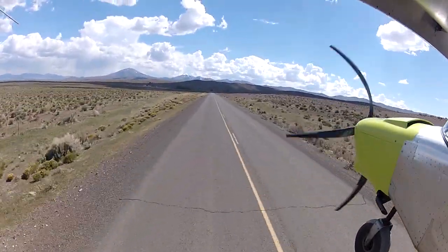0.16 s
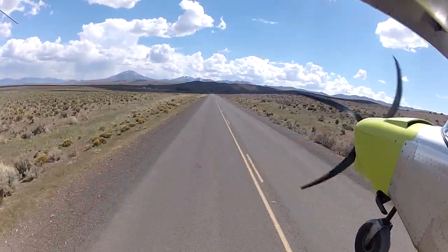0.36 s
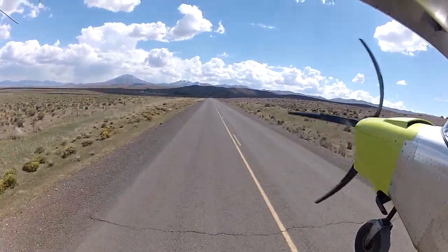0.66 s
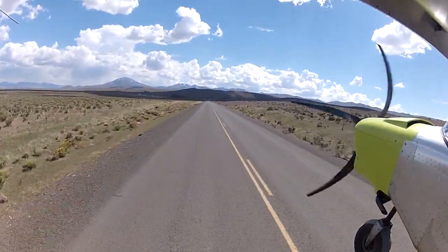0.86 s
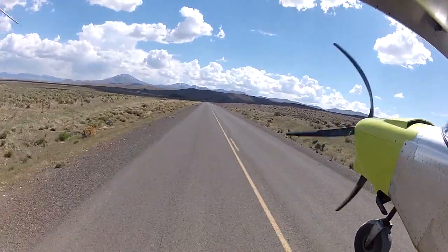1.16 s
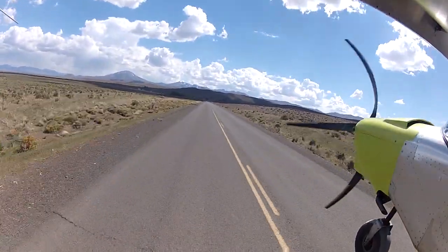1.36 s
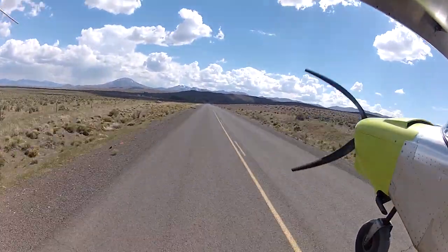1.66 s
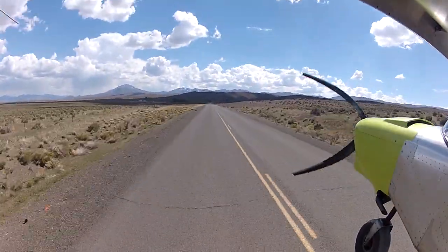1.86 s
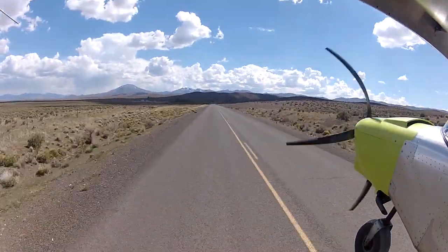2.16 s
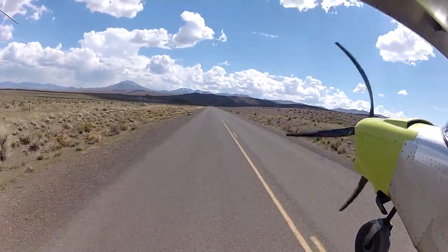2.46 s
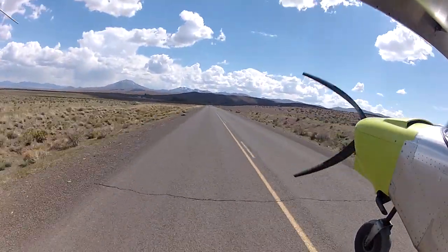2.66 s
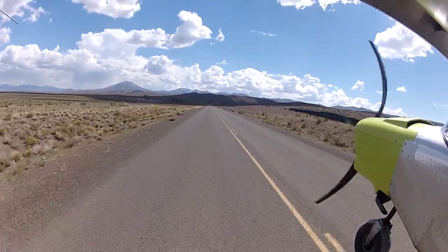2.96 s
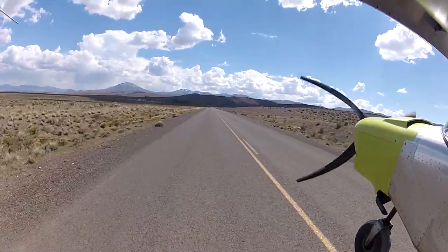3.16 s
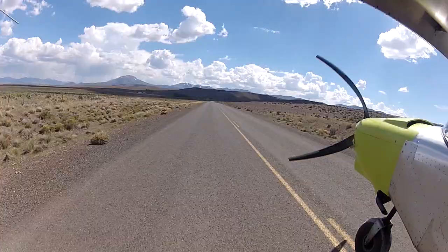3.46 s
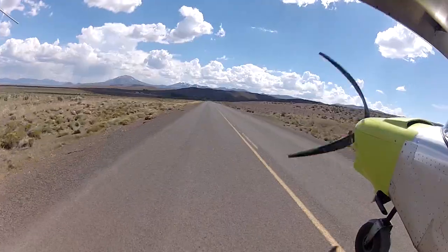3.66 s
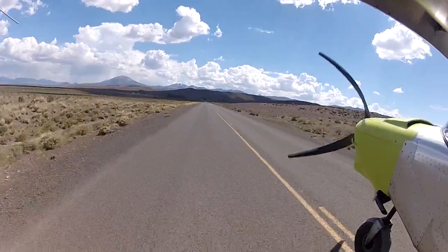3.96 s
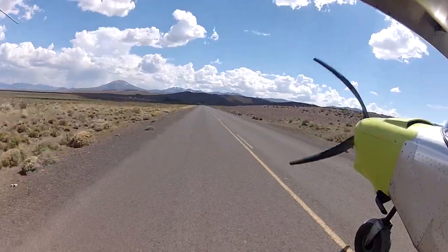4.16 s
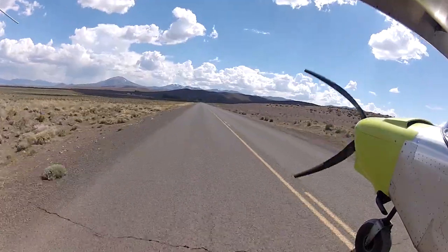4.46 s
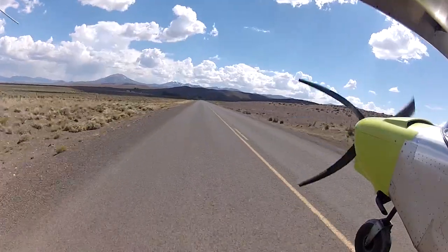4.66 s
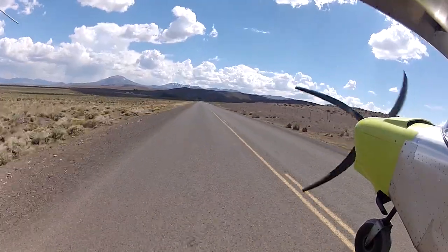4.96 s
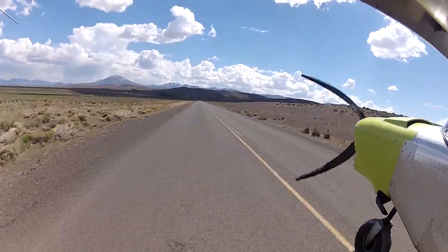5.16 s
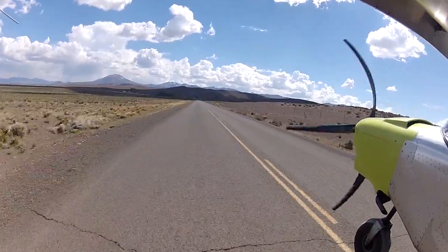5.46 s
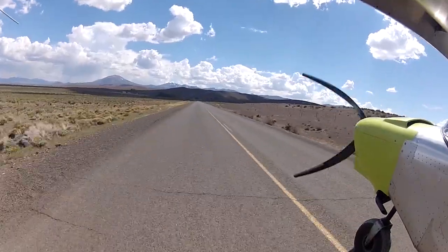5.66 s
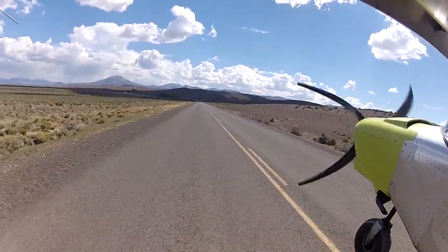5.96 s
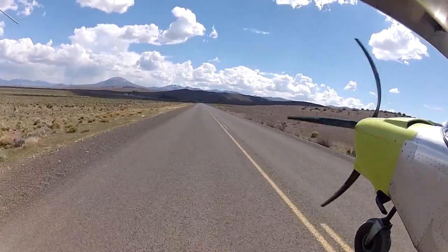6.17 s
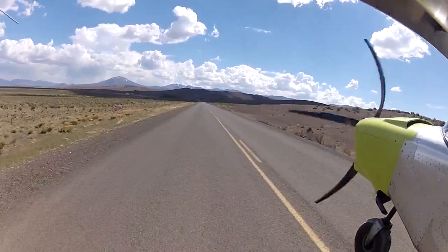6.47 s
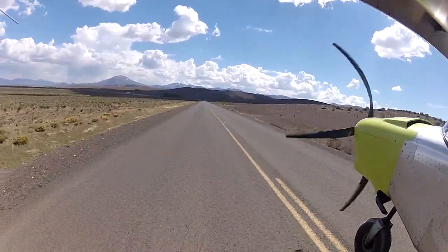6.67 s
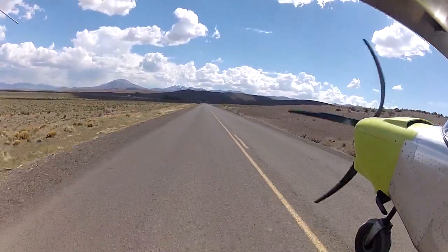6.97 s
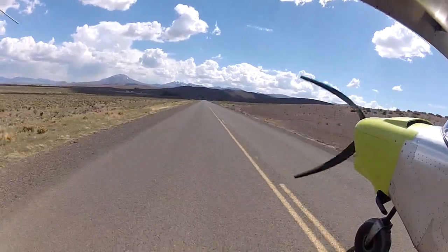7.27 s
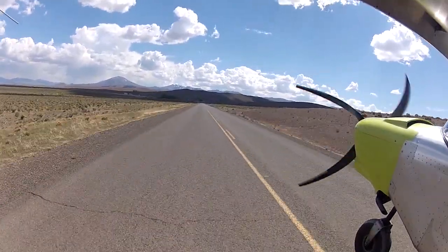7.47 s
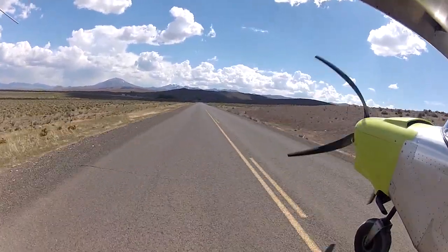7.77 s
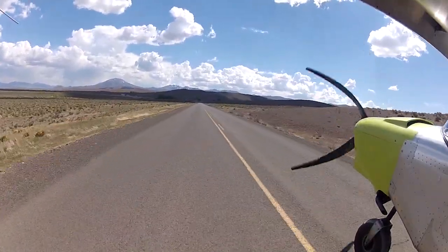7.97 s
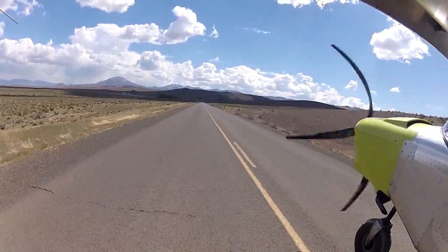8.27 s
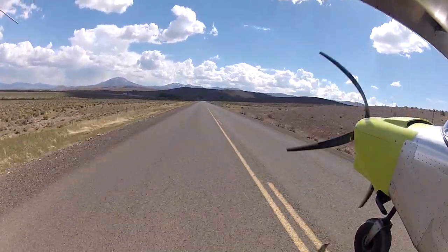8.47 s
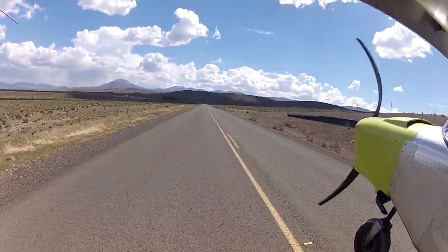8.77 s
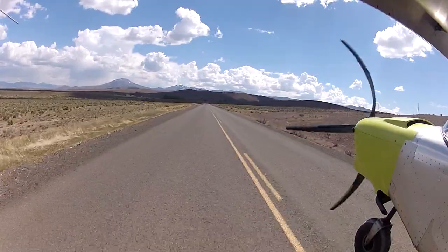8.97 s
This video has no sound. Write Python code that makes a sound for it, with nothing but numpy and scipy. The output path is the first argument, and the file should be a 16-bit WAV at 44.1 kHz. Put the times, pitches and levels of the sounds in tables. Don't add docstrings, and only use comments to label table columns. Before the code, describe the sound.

Low throbbing engine idle and airy hiss, then a touchdown thump at three seconds, rumbling tyres and loose plastic clicks on a small plane.

```python
import sys
import numpy as np
from scipy import signal
from scipy.fft import rfft, irfft, next_fast_len
from scipy.io import wavfile
from scipy.ndimage import uniform_filter1d, minimum_filter1d

SR = 44100
rng = np.random.default_rng(int(sys.argv[2]) if len(sys.argv) > 2 else 0)


def to_linear_factor(level_db):
    exponent = np.asarray(level_db, float) / 20
    return 10 ** exponent


def file_out(sig):
    cols = np.atleast_2d(sig).T
    lim = np.clip(cols, -1, 1)
    pcm = np.round(lim * 32767).astype(np.int16)
    wavfile.write(sys.argv[1], SR, pcm)


N = 402191

# (time [s], level [dB])
ROAD = [(3.32, -39), (3.33, -22), (3.37, -18.5), (3.48, -20), (3.74, -26.5), (3.79, -21.5), (3.85, -28.5),
        (4.01, -24.5), (4.18, -24.5), (4.32, -32.5), (4.45, -28), (4.51, -23), (4.79, -26.5), (5.0, -24),
        (5.34, -27), (5.5, -25), (6.95, -26.5), (9.12, -28)]
RUMBLE_TOP_HZ, HUM_TOP_HZ = 170, 600


def rms_one(x):
    return x / np.sqrt(np.mean(x ** 2) + 1e-20)


def in_time(rows):
    s, *columns = np.transpose(rows)
    return [np.interp(np.arange(N) / SR, s, c) for c in columns]


def drift(rate):
    r = np.exp(-80 * np.pi * rate / SR)
    slow = signal.lfilter([1], [1, -2 * r, r * r], rng.standard_normal(N // 40 + 2002))
    slow = rms_one(slow[2000:])
    return np.interp(np.arange(N) / 40, np.arange(len(slow)), slow)


def spells(rows, rest_db, attack_s, release_s):
    t = np.arange(0, N + 64, 64) / SR
    shapes = []
    for s, hold, db in rows:
        ramp = np.minimum((t - s) / attack_s, (s + hold - t) / release_s) + 1
        shapes.append((db - rest_db) * np.clip(ramp, 0, 1))
    return rest_db + np.interp(np.arange(N) / SR, t, np.max(shapes, axis=0))


def filtered(x, order, edge_hz, kind):
    return signal.sosfilt(signal.butter(order, edge_hz, kind, fs=SR, output="sos"), x)


def resonate(x, hz, width):
    r = np.exp(-np.pi * width / SR)
    poles = [1, -2 * r * np.cos(2 * np.pi * hz / SR), r * r]
    return signal.lfilter(np.array([1, 0, -1]) * (1 - r * r) / 2, poles, x)


def ringing_noise(hz, width):
    return rms_one(resonate(resonate(rng.standard_normal(N), hz, width), hz, width))


def coloured(spectrum):
    size = next_fast_len(N)
    hz = np.maximum(np.arange(size // 2 + 1) * SR / size, 1)
    knot_hz, knot_db = np.transpose(spectrum)
    shape = to_linear_factor(np.interp(np.log(hz), np.log(knot_hz), knot_db))
    return rms_one(irfft(rfft(rng.standard_normal(size)) * shape, size)[:N])


def tone(turns, waver_db):
    sine = np.sin(2 * np.pi * (turns + rng.random()))
    return np.sqrt(2) * sine * to_linear_factor(waver_db * drift(2.3))


def through_mode(hz, mode_hz, half_hz, top_db, steep):
    return top_db - steep * 10 * np.log10(1 + ((hz - mode_hz) / half_hz) ** 2)


def touchdown():
    return np.clip((np.arange(N) / SR - ROAD[0][0]) / .01, 0, 1)


def engine():
    # (time [s], firing rate [Hz], firing level [dB])
    idle = [(0.0, 85, -26), (0.12, 83, -25), (0.27, 77.0, -22.5), (0.6, 73.6, -26), (0.9, 74.53, -24),
            (1.8, 72.8, -30.5), (2.1, 70.9, -24.5), (2.4, 71.46, -25), (2.7, 69.85, -24),
            (3.6, 64.9, -32.5), (4.2, 64.86, -31), (4.65, 63.55, -32), (5.1, 64.76, -31),
            (5.7, 69.2, -38.5), (6.6, 70.9, -28.5), (6.9, 70.66, -25.5), (7.3, 71.78, -22.5),
            (9.12, 71.7, -24.5)]
    # (multiple of firing, level against firing [dB])
    weak_orders = [(.75, -6), (1.5, -23), (3, -22)]
    firing_hz, firing_db = in_time(idle)
    turns = np.cumsum(firing_hz) / SR
    crank_db = through_mode(firing_hz / 2, mode_hz=39.5, half_hz=2.5, top_db=-10, steep=3)
    crank_db -= 7.5 * touchdown()
    second_db = through_mode(2 * firing_hz, mode_hz=130.5, half_hz=8, top_db=-34.5, steep=2)
    out = to_linear_factor(firing_db) * tone(turns, waver_db=1.4)
    out += to_linear_factor(crank_db) * tone(turns / 2, waver_db=1.5)
    out += to_linear_factor(second_db) * tone(2 * turns, waver_db=2.5)
    out += to_linear_factor(firing_db) * sum(to_linear_factor(db) * tone(k * turns, waver_db=4.5) for k, db in weak_orders)
    return out + propeller(firing_hz, turns)


def propeller(firing_hz, turns):
    blades_per_firing = 3 / (2 * 2.43)
    beat_db = through_mode(blades_per_firing * firing_hz, mode_hz=39, half_hz=3.4, top_db=-6, steep=1.27)
    blade = tone(blades_per_firing * turns, waver_db=0.64)
    blade += to_linear_factor(-34.5) * tone(2 * blades_per_firing * turns, waver_db=5.5)
    return to_linear_factor(beat_db) * faltering() * blade


def faltering():
    # (time [s], level [dB], fall or rise to it [s],
    # recovery [s])
    breaks = [(0.741, -12, .16, .33), (1.36, -11, 0.16, .13), (1.85, -18, 0.16, 0.1),
              (2.35, -12, 0.26, 0.26), (3.479, -7, 0.14, 0.063), (3.61, -13, 0.12, 0.14),
              (4.17, -10.5, 0.16, 0.046), (4.37, -28, 0.27, 0.37), (5.46, 0.5, 0.07, 0.17),
              (6.03, -22, 0.065, 0.34), (6.44, -13, .15, 0.14), (6.71, -5, 0.13, .11),
              (7.1, -22, 0.16, .11), (7.36, -14, 0.13, .15), (7.499, -5, 0.11, 0.078),
              (7.63, -12, 0.058, 0.29), (8.11, 4, .16, .14), (8.46, -10, 0.1, .27), (8.95, -7, 0.14, .2)]
    t = np.arange(0, N + 64, 64) / SR
    gains = []
    for s, db, fall, recovery in breaks:
        gains.append(1 + (to_linear_factor(db) - 1) * np.interp(t, [s - fall, s, s + recovery], [0, 1, 0]))
    return np.interp(np.arange(N) / SR, t, np.prod(gains, axis=0))


def buffet():
    # (frequency [Hz], width [Hz], level [dB])
    bending_modes = [(46.55, 4.6, -4.5), (57.2, 6.8, -2), (77, 25, -28)]
    # (time [s], hold [s], level [dB])
    gusts = [(.1, 0.1, -22), (.51, 0.15, -24), (1.05, 0.073, -22), (1.42, 0, -13.5), (1.8, 0.14, -19),
             (2.36, 0.32, -20), (3.2, 0, -22), (3.43, 0.34, -12.5), (3.9, 0.36, -16.5), (4.67, 0.22, -13.5),
             (5.4, 0.0059, -17), (5.66, 0.034, -14.5), (5.87, 0, -17), (6.29, 0, -21), (6.5, .1, -23.5),
             (6.9, 0.19, -21), (7.17, 0.045, -19), (7.92, .12, -19), (8.62, .12, -16.5)]
    bending = sum(to_linear_factor(db) * ringing_noise(hz, width) for hz, width, db in bending_modes)
    bending = rms_one(filtered(bending, 4, 34, "high"))
    swing = np.sqrt(uniform_filter1d(bending ** 2, size=4000) + 0.24)
    gust_db = spells(gusts, rest_db=-30.5, attack_s=.13, release_s=.13)
    return to_linear_factor(gust_db) * rms_one(bending / swing)


def airflow():
    # (time [s], level [dB])
    rush = [(0, -26.5), (.97, -25.5), (1.15, -28), (3.1, -30.5), (4.3, -32), (4.7, -33.5), (5.9, -33.5),
            (6.4, -39), (6.9, -36), (9.12, -35)]
    air_db, = in_time(rush)
    return to_linear_factor(air_db + 0.39 * drift(16.0))


def air_noise(air):
    # (frequency [Hz], level per Hz [dB])
    air_spectrum = [(53, -30), (90, -11.5), (119, -12.5), (188, -8.5), (257, -16), (398, -15.5), (565, -21),
                    (1010, -19), (2460, -11.5), (3140, -25.5), (5900, -32.5), (7670, -74), (13000, -120)]
    return air * coloured(air_spectrum)


def drumming():
    # (frequency [Hz], width [Hz], level [dB])
    panel_modes = [(179.9, 15, -6), (195.7, 12.8, -6.5), (209.5, 7.6, -10.5)]
    # (time [s], hold [s], level [dB])
    drum_spells = [(0, 0.13, -17), (.43, 0, -12.5), (.55, 0.2, -20.5), (1.14, 0.013, -23.5),
                   (2.26, 0.0077, -23), (3.62, .04, -22.5), (3.99, 0, -24), (4.55, 0.016, -23.5),
                   (5.1, 0.27, -25.5), (6.07, 0, -27), (6.3, .35, -29), (7.5, .12, -28)]
    panel_db = spells(drum_spells, rest_db=-27, attack_s=0.21, release_s=0.11) + 1.47 * drift(2.05)
    return to_linear_factor(panel_db) * sum(to_linear_factor(db) * ringing_noise(hz, width) for hz, width, db in panel_modes)


def tyre_drives():
    # (time [s], hold [s], level above their usual hum [dB])
    shudders = [
        (3.5, 0.25, 4.5),
        (4.22, 0.22, 6.5),
        (5.1, 0.17, 1.5),
        (6.05, 0.38, 2.5),
        (7.4, 0.045, 0),
    ]
    roar_db, = in_time(ROAD)
    swing_db = roar_db + 26.5
    rumble_db = -30.5 + 0.73 * swing_db + 1.56 * drift(5.9)
    hum_db = -33.5 + 0.74 * swing_db + 1.23 * drift(5.9)
    hum_db += spells(shudders, rest_db=0, attack_s=0.044, release_s=0.044)
    roar_db = roar_db + 0.27 * drift(4.0)
    grit = 1.3 * drift(45)
    return [touchdown() * to_linear_factor(db + 0.32 * drift(7.16) + grit) for db in (rumble_db, hum_db, roar_db)]


def road_noise(rumble, hum, roar):
    # (frequency [Hz], level per Hz [dB])
    road_spectrum = [(53, -29), (90, 10), (119, -1), (194, -2), (262, -6.5), (398, -6.5), (565, -9),
                     (1180, -7.5), (1310, -8), (2460, -15), (5900, -66), (7670, -79), (13000, -120)]
    bed = coloured(road_spectrum)
    low = filtered(bed, 4, RUMBLE_TOP_HZ, "low")
    middle = filtered(bed, 2, [RUMBLE_TOP_HZ, HUM_TOP_HZ], "band")
    high = filtered(bed, 4, HUM_TOP_HZ, "high")
    return to_linear_factor(2.5) * rumble * low + to_linear_factor(3.0) * hum * middle + to_linear_factor(-0.5) * roar * high


def airframe():
    # (frequency [Hz], width [Hz], level from airflow [dB], level from tyres [dB])
    frame_modes = [(129.4, 32, -19, -7.5), (155.5, 25, -10, -6), (324, 115, -21, -8.5),
                   (402.5, 12.2, -11.5, -4), (382.3, 55, -19.5, -9), (479.7, 74, -18, -11.5),
                   (726, 97, -17.5, -9.5), (964.6, 77, -15, -5), (1033.5, 77, -12, -6.5),
                   (1142, 70, -12, -7), (1210.6, 69, -12, -7.5), (1370, 47, -19, -23.5),
                   (1729, 213, -4, -9.5), (1920, 580, -6, -35.5), (2417, 315, -2.5, -14),
                   (2865, 350, -13.5, -15.5), (3388, 110, -19.5, -34), (3713, 350, -17.5, -23.5),
                   (4810, 470, -26.5, -31.5), (5475, 220, -28.5, -49)]
    air = airflow()
    rumble, hum, roar = tyre_drives()
    out = air_noise(air) + drumming() + road_noise(rumble, hum, roar)
    for hz, width, air_share_db, road_share_db in frame_modes:
        road = rumble if hz < RUMBLE_TOP_HZ else hum if hz < HUM_TOP_HZ else roar
        power = (air * to_linear_factor(air_share_db)) ** 2 + (road * to_linear_factor(road_share_db)) ** 2
        out += np.sqrt(power) * to_linear_factor(drift(7.4)) * ringing_noise(hz, width)
    return out


def wheels():
    # (time [s], turns per second [Hz], level [dB])
    spin = [
        (3.4, 9.13, -46.9),
        (3.6, 13.02, -37.5),
        (3.8, 16.72, -40.3),
        (4.1, 15.89, -40),
        (4.8, 16.52, -39.5),
        (5.6, 15.46, -35.5),
        (6.8, 15.21, -45),
        (7.6, 15.59, -46),
        (8.4, 13.94, -41.5),
        (9.12, 14.03, -42),
    ]
    # (multiple of turns, level [dB])
    spin_orders = [(1, 2.5), (2, 1.5), (3, 12.5), (4, 9), (5, -3), (6, -9.5)]
    per_s, level_db = in_time(spin)
    turns = np.cumsum(per_s) / SR
    orders = sum(to_linear_factor(db) * tone(k * turns, waver_db=0.5) for k, db in spin_orders)
    return touchdown() * to_linear_factor(level_db) * orders


def housing(clicks):
    # (frequency [Hz], width [Hz], level [dB])
    shell_modes = [(3670, 1640, 3), (4820, 230, 2), (1106.3, 500, -12), (5420, 670, -3)]
    clicks = clicks + 1e-18
    return sum(to_linear_factor(db) * resonate(resonate(clicks, hz, width), hz, width) for hz, width, db in shell_modes)


def rattle(shake):
    # (time [s], hold [s], level [dB])
    tick_spells = [(3.3, 0.13, -59), (3.64, 0.025, -44), (3.82, .12, -53), (4.0, 0.22, -56),
                   (4.74, 0.88, -55), (5.75, .22, -61), (6.23, 0.035, -55), (6.37, 0.079, -56),
                   (6.74, 0.15, -55), (7.12, 0.046, -53), (7.21, 0, -49), (7.42, 0, -52),
                   (7.73, 0.015, -55), (7.84, 0.02, -64), (8.2, 0.11, -57), (8.37, 0.034, -54),
                   (8.6, 0.13, -56)]
    swing = np.clip(shake / .5, 0, 1.6) ** 2
    ticks_per_s = (200 + 450 * swing) * touchdown()
    struck = rng.random(N) < ticks_per_s / SR
    sizes = to_linear_factor(2.0 * np.minimum(rng.exponential(1, N), 3)) * rng.choice([-1, 1], N)
    tick_db = spells(tick_spells, rest_db=-69, attack_s=0.059, release_s=0.1) + 8.5
    return to_linear_factor(tick_db) * rms_one(housing(struck * sizes))


def knocks(shake):
    # (time [s], peak level [dB])
    blows = [(3.4372, -25), (3.5525, -25), (3.5809, -23), (3.6298, -28), (3.6458, -31), (3.8305, -28),
             (3.9508, -30), (4.0523, -25), (3.766, -29), (4.155, -30), (4.4958, -29), (4.7488, -34),
             (4.9079, -32), (5.0111, -27), (5.1124, -30), (5.1603, -30), (5.2308, -30), (5.26, -30),
             (5.3619, -24), (5.3848, -29), (5.4806, -28), (5.6075, -30), (5.6984, -24), (5.8372, -27),
             (6.2346, -30), (6.8031, -34), (6.9204, -30), (6.9385, -26), (7.2133, -30), (7.9112, -31)]
    clicks, luck, size_db = np.zeros(N), rng.random(N), rng.normal(0, 2, N)
    swing = uniform_filter1d(shake, size=100) * touchdown()
    tops = signal.find_peaks(swing, height=.33, distance=600)[0]
    clicks[tops] = (luck[tops] < .4) * to_linear_factor(-33 + size_db[tops])
    for s, db in blows:
        clicks[round(s * SR)] = to_linear_factor(db)
    return housing(to_linear_factor(21.5) * clicks)


def scene():
    shake = engine() + buffet() + wheels()
    return (shake + airframe() + rattle(shake) + knocks(shake))[None]


def stretched(x):
    quarter = signal.resample_poly(x, 40, 147, axis=1)
    return signal.resample_poly(np.repeat(quarter, 4, axis=1), 147, 160, axis=1)[:, :N]


def limited(x):
    room_left = minimum_filter1d(1.04 / np.maximum(np.abs(x), 1.04), size=881, axis=1)
    return x * uniform_filter1d(room_left, size=441, axis=1)


def low_pass(x):
    return signal.sosfilt(signal.butter(12, 16180, fs=SR, output="sos"), x)


def record(dry):
    fade_start_s, fade_end_s = 8.24, 9.287
    fade = np.clip((fade_end_s - np.arange(N) / SR) / (fade_end_s - fade_start_s), 0, 1)
    top_cut = signal.ellip(14, .3, 70, 15090, fs=SR, output="sos")
    mix = signal.sosfilt(top_cut, limited(stretched(dry)) * fade)
    return low_pass(mix)


dry = scene()
out = record(dry)
file_out(out)
```